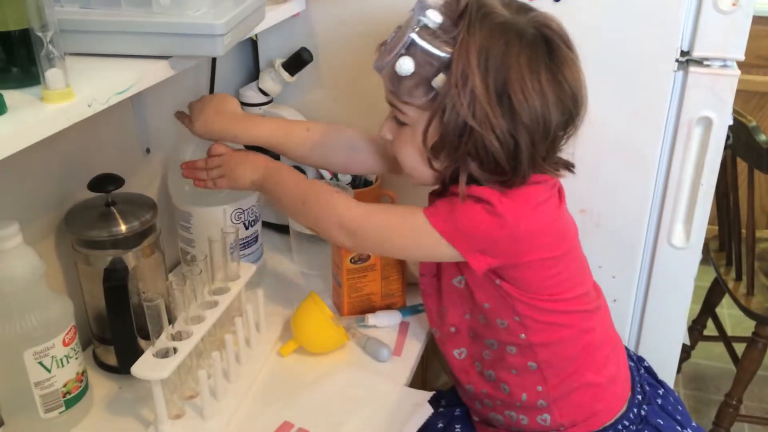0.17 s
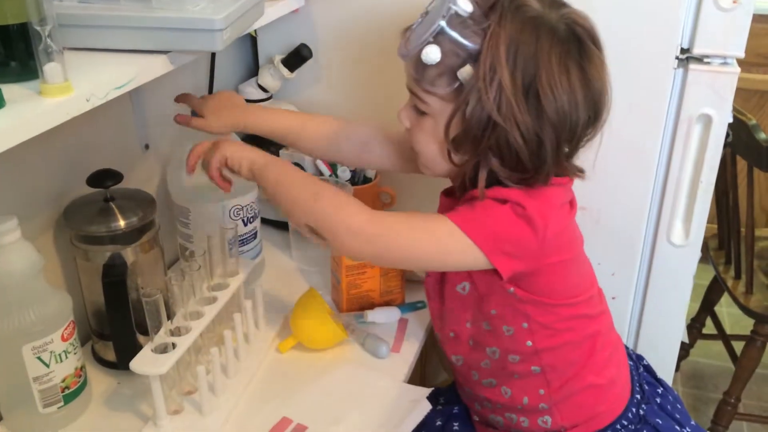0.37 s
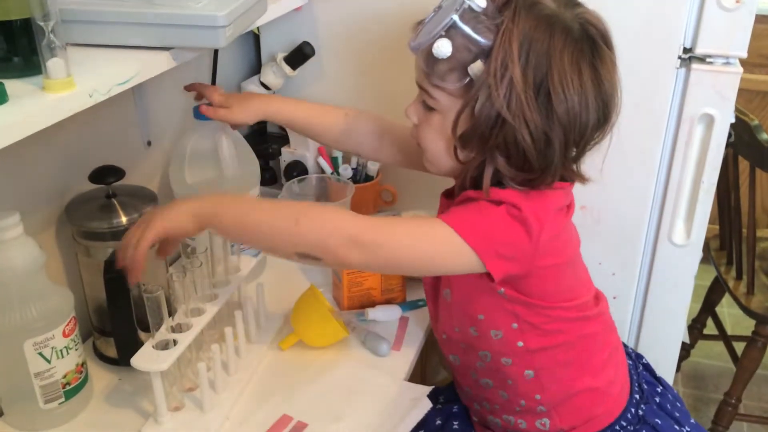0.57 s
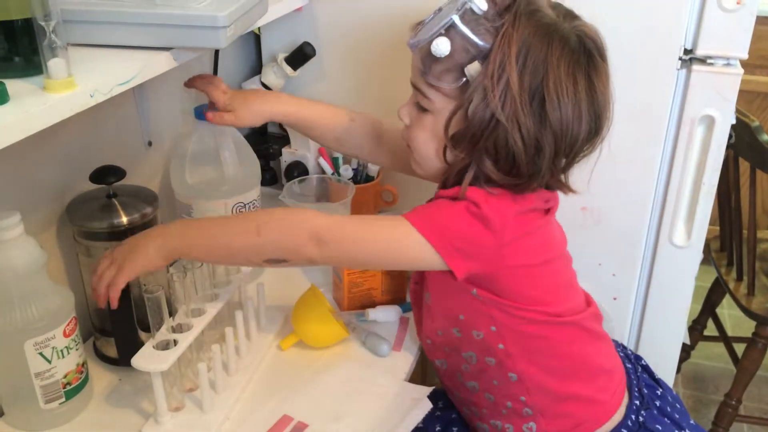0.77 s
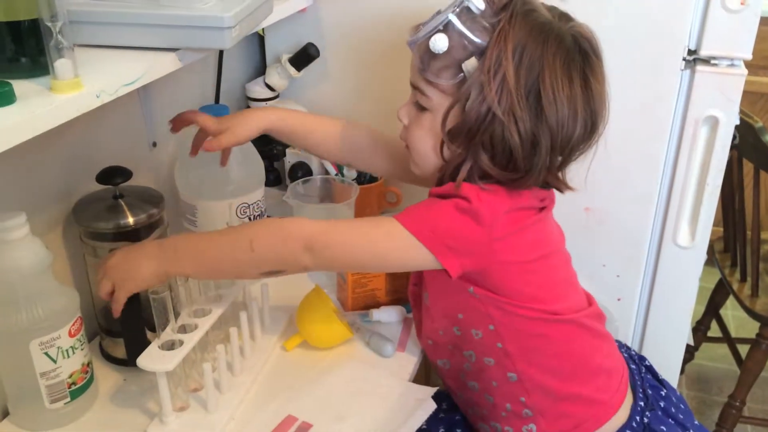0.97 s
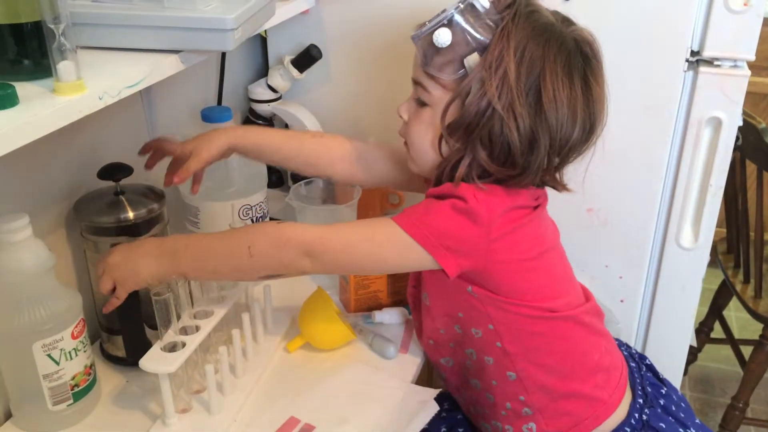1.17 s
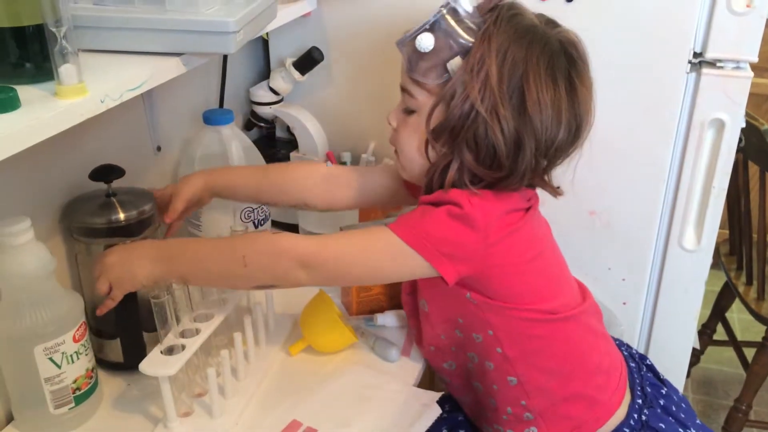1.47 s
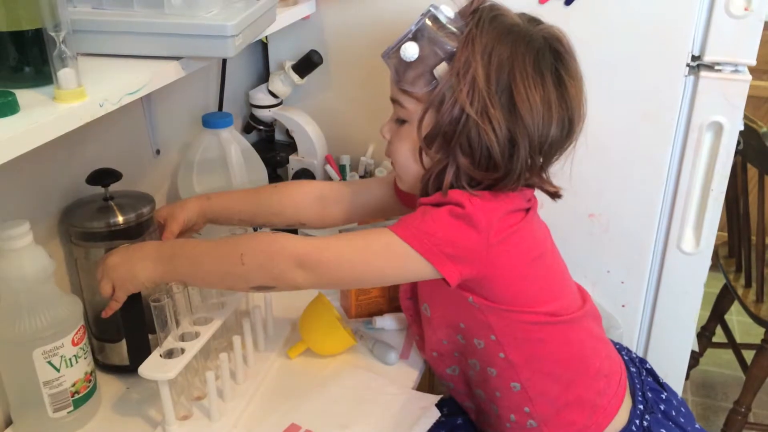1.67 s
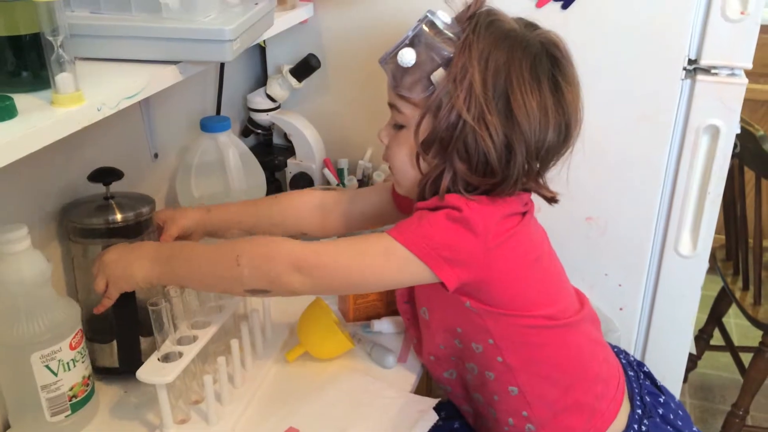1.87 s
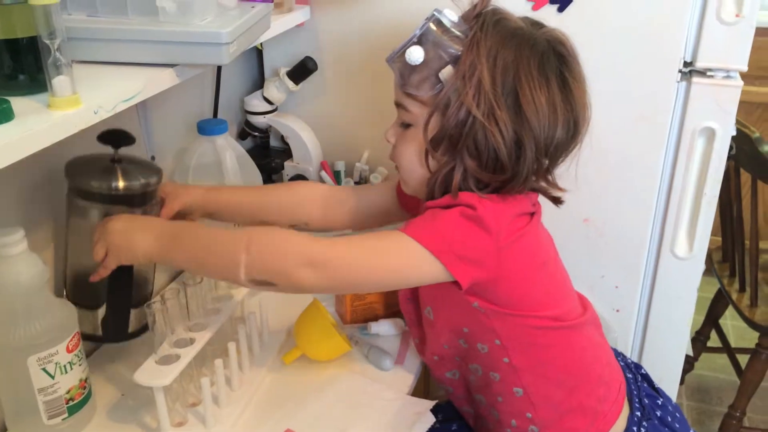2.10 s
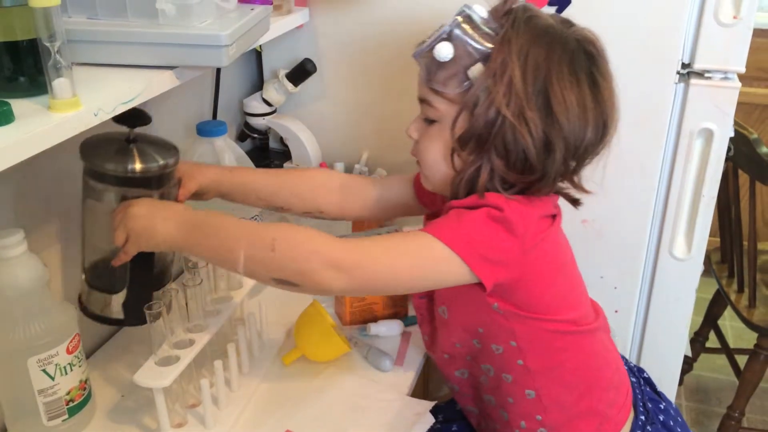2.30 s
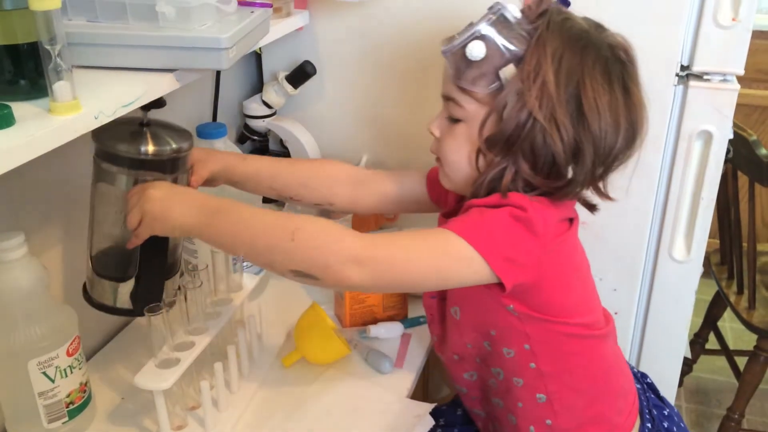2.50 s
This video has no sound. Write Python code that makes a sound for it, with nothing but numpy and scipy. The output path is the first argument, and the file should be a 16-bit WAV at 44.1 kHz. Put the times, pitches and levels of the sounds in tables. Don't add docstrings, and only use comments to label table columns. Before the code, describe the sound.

A glass coffee pot is handled with faint clicks, then knocks lightly and hard on a counter

```python
import sys
import numpy as np
from scipy import signal
from scipy.fft import rfft, irfft
from scipy.io import wavfile
from scipy.ndimage import uniform_filter1d

SR = 44100
rng = np.random.default_rng(int(sys.argv[2]) if len(sys.argv) > 2 else 0)


def rack_gain(trim_db):
    fader = np.asarray(trim_db, float)
    return 10 ** (fader / 20)


def store_pcm(level_fs):
    pcm = np.round(np.clip(level_fs, -1, 1) * 32767).astype(np.int16)
    wavfile.write(sys.argv[1], SR, np.atleast_2d(pcm).T)


N = 116865
T = np.arange(N) / SR

# (time [s], level [dB], contact [ms], shudder level [dB], shudder t60 [s])
BLOWS = [
    (1.5489, -26, 0.71, -33.5, 0.19),
    (2.0454, -15, 1.0, -19, 0.16),
]
# (frequency [Hz], level [dB], t60 [s])
COUNTER_LIGHT_MODES = [(218, -8, .07), (315, -11, 0.19), (395, 1, 0.053), (473, -4.5, 0.086),
                       (616, -4.5, 0.03), (793, -4.5, 0.047), (936, -9, 0.049), (1460, -7, 0.018)]
# (frequency [Hz], level [dB], t60 [s])
COUNTER_HARD_MODES = [(142, -1, 0.19), (194.2, -1, 0.23), (251.8, -1, 0.19), (309.7, -10, 0.3),
                      (354.8, -12, 0.33), (403.7, -17, 0.33), (521.4, -8.5, 0.15), (650, -9.5, 0.09),
                      (764, -29, 0.088), (875, -23, .07), (979, -12.5, 0.12), (1250, -28, 0.071),
                      (1314, -5, 0.081), (1670, -26, .05)]
# (frequency [Hz], density [dB/Hz])
SHUDDER_SPECTRA = [
    [(88, -37), (150, -30), (199, 2), (255, -3), (328, 12.5), (1120, -26), (8000, -53), (10400, -90), (17600, -120)],
    [(88, -53), (150, -6.5), (233, -8.5), (450, -20.5), (973, -27.5), (1430, -31.5), (2100, -35), (12000, -88), (15600, -103), (22000, -120)],
]
SWELL_START_S = (.202, .202, .202, .27, .401, .983, 1.228, 1.245, 1.288, 1.34, 1.4, 1.42, 1.55, 2.049, 2.42,
                 2.421, .205, .765, .974, .982, .983, .986, .99, 1.56, 2.039, 2.06, 2.075, 2.095, 2.115,
                 2.4205, 2.428, 2.438, 2.44, 2.458, 2.634, 1.31, .909, 2.2)
# (level [dB], frequency [Hz], rise [s], t60 [s])
SWELLS = [(-47, 1640, 0.0016, 0.042), (-37, 2250, 0.00084, 0.034), (-36.5, 5640, 0.00087, 0.02),
          (-48.5, 330, 0.015, 0.15), (-50, 1600, 0.0011, .03), (-36, 1410, 0.0019, 0.0087),
          (-41.5, 937, 0.0024, 0.031), (-45, 143, .02, 0.14), (-40.5, 170, .015, 0.065),
          (-37, 176, .02, .13), (-41, 156, 0.02, 0.095), (-42.5, 380, 0.016, 0.11),
          (-37.5, 1506, .001, 0.027), (-27, 290, 0.028, 0.17), (-37, 1188, 0.00077, 0.034),
          (-39, 2450, 0.00085, .02), (-32.5, 130, 0.0036, 0.029), (-33, 146, 0.0033, 0.036),
          (-31.5, 170, 0.0019, .04), (-44, 5700, 0.0016, 0.023), (-38, 512, 0.0043, 0.11),
          (-44, 730, 0.0021, 0.092), (-25, 157.6, 0.022, 0.17), (-12.5, 174.3, 0.042, 0.1),
          (-26, 91, 0.001, 0.061), (-16.5, 81, 0.037, 0.17), (-20, 113, 0.015, 0.19),
          (-28.5, 49.5, 0.028, 0.22), (-25, 230, 0.0054, 0.15), (-43, 5200, 0.00087, 0.016),
          (-44, 1700, 0.0011, .02), (-46, 1300, .006, 0.037), (-61, 1200, 0.024, 0.16),
          (-76, 970, 0.0058, 0.039), (-42.5, 580, 0.0028, 0.05), (-40, 1360, 0.0018, .02),
          (-44, 1650, 0.0017, 0.028), (-50, 290, 0.0305, 0.42)]
# (time [s], level [dB], centre [Hz], t60 [s])
CRACKS = [(0.144, -53.5, 4870, 0.051), (0.2025, -34.5, 8400, 0.029), (0.2042, -36.5, 2630, 0.03),
          (0.3994, -44.5, 2170, 0.023), (0.478, -55, 4570, 0.093), (0.645, -58.5, 4730, 0.041),
          (0.758, -60, 8000, 0.032), (.8175, -61, 5890, 0.029), (0.9088, -44, 4030, 0.012),
          (.968, -51.5, 5400, 0.051), (0.981, -37.5, 3270, 0.018), (1.058, -52.5, 5900, 0.021),
          (1.228, -49.5, 3500, 0.042), (1.55, -45, 2500, 0.013), (1.785, -59, 6670, 0.016),
          (1.621, -67.5, 5900, 0.25), (1.93, -54, 4400, 0.018), (2.047, -30, 3700, 0.018),
          (2.05, -56.5, 7000, 0.1), (2.063, -49, 2000, .03), (2.084, -57, 1510, 0.029),
          (2.121, -56, 1500, 0.029), (2.4192, -39.5, 3330, 0.016), (2.429, -72, 2780, 0.16),
          (2.629, -48, 2900, 0.022), (2.6349, -72, 4500, 0.011)]
# (time [s], counter level [dB], handle level [dB], handle pitch [ratio], tail level [dB])
POT_TAPS = [(0.202, -41, -43, 1.03, -63), (0.4, -48, -79, 1.26, -46.5), (0.909, -49.5, -51.5, 0.88, -41.5),
            (0.983, -36, -32.5, 1.05, -46), (0.994, -48, -50, 1.1, -64), (1.061, -54, -51, 1.06, -75),
            (1.0795, -52, -54, 1.02, -63), (1.2276, -49, -45, 0.755, -44.5), (1.311, -56, -52, 1.2, -62),
            (1.494, -69, -55, 1.6, -80), (1.55, -60, -59, 1.19, -48), (1.9328, -65, -50.5, 0.78, -53.5),
            (2.0031, -77, -51, 0.59, -52.5), (2.4204, -50.5, -34, 0.97, -42.5),
            (2.6323, -70, -44.5, 0.91, -38)]
# (frequency [Hz], level [dB], t60 [s])
TOUCH_MODES = [(135, -7.5, 0.078), (154.2, -1.5, 0.19), (195.6, -5.5, 0.13), (280.7, -12.5, 0.18),
               (359.5, -5, 0.088), (570, -4.5, 0.062)]
# (frequency [Hz], level [dB], t60 [s])
HANDLE_MODES = [(760, -8, .012), (980, -2, .016), (1180, -1, .014), (1360, 0, .018), (1640, -2, .014),
                (2300, -10, .01), (3200, -14, .008)]
# (frequency [Hz], level [dB], t60 [s])
LID_MODES = [(8900, -8, .07), (9270, -4, .09), (10260, 0, .09), (12630, -4, .06)]
# (time [s], length [s], pitch by resting position [ratio])
JINGLE_TIMES = [(.95, .02, 1), (.983, .01, 1.01), (1.072, .065, 1), (1.228, .01, 1.03), (1.9, .045, 1),
                (1.962, .01, 1.035), (2.4212, .045, 1), (2.635, .01, 1.02)]
# (strike level [dB], chatter level [dB], tilt [dB/mode])
JINGLE_LEVELS = [(-63, -83, -2), (-44, -75, -7.5), (-74, -76, 3), (-47, -72, -9), (-81, -82, 1.5),
                 (-60, -80, -3), (-52, -73, 2.2), (-64, -79, 2)]
# (time [s], level [dB], extra treble [dB])
RUB_MOTION = [(0.0, -61.5, -7.5), (0.38, -63, 2.5), (0.65, -69.5, -2.5), (0.9, -71, -2.5), (1.11, -66, -4),
              (1.2, -67, -3), (1.31, -60.5, -9.5), (1.42, -63, -11), (1.62, -83, 7), (2.1, -73.5, -2),
              (2.23, -83.5, 5), (2.65, -89, 11)]
# (frequency [Hz], density [dB/Hz])
RUB_SPECTRUM = [(300, -14.5), (500, -0.5), (1200, -6), (2400, -8), (4000, -12), (7000, -11.5), (10000, -19),
                (15000, -51)]
# (frequency [Hz], t60 [s])
SQUEAK_MODE = (3050, .014)
# (time [s], level [dB])
SQUEAK_LEVEL = [(.1, -76), (.24, -65), (.36, -65), (.47, -65), (.65, -75), (.8, -90), (1.08, -82),
                (1.14, -68), (1.2, -78), (1.3, -70), (1.45, -76), (1.6, -95)]
# (time [s], level [dB])
SLIDE_LEVEL = [(1.22, -88), (1.26, -50.5), (1.3, -49.5), (1.37, -51), (1.43, -48), (1.47, -60), (1.52, -71)]
# (frequency [Hz], level [dB], t60 [s])
SCRAPE_MODES = [(149.3, 1.5, 0.14), (169, -0.5, 0.085), (292, -5, .08), (354, -5.5, 0.099),
                (540, -24, 0.033)]
# (frequency [Hz], density [dB/Hz])
HUM_SPECTRUM = [(18, -24), (30, 1.5), (113, -0.5), (180, -7), (460, -18), (1140, -29.5), (1780, -29),
                (15000, -41)]
# (frequency [Hz], level [dB], t60 [s])
DRONE_MODE = (119, -58.5, 0.34)
# (time [s], gain [dB])
LEAN_GAIN = [(0, -1), (.17, 3.5), (.45, 2), (.7, 0), (.95, 0), (1.2, -3), (1.45, -4.5), (1.6, 2),
             (1.85, -11), (2.2, -2), (2.4, -4.5), (2.65, -5.5)]


def level(x, db):
    return x * rack_gain(db) / np.sqrt(np.mean(x ** 2))


def decay(u_s, t60_s):
    return np.exp(-np.log(1000) * u_s / t60_s)


def fade(t0_s, rise_s, t60_s):
    u_s = np.maximum(T - t0_s, 0)
    return (1 - np.exp(-u_s / rise_s)) * decay(u_s, t60_s)


def curve(points):
    return rack_gain(np.interp(T, *np.array(points).T))


def ring(force, modes, ratio=1, tilt_db=0):
    out = np.zeros(len(force))
    for k, (hz, db, t60_s) in enumerate(modes):
        t60_s = min(max(t60_s, .005), .5)
        pole = np.exp(2j * np.pi * hz * ratio / SR - np.log(1000) / (t60_s * SR))
        mode = signal.lfilter([1], [1, -pole], force).imag
        out = out + (-1) ** k * rack_gain(db + tilt_db * k) * mode
    return out


def colour(points):
    hz, db = np.array(points).T
    f_hz = np.maximum(np.arange(N // 2 + 1) * SR / N, 1)
    gain = rack_gain(np.interp(np.log(f_hz), np.log(hz), db))
    return level(irfft(rfft(rng.standard_normal(N)) * gain, N), 0)


def walk(rate_hz):
    k = int(SR / rate_hz)
    steps = np.repeat(rng.standard_normal(N // k + 1), k)
    w = uniform_filter1d(uniform_filter1d(steps, k), k)[:N]
    return w / w.std()


def burst(noise, t0_s, rise_s, t60_s, hz):
    edges_hz = [hz / 3, min(hz * 2, 20000)]
    band = signal.butter(2, edges_hz, "band", fs=SR, output="sos")
    return signal.sosfilt(band, noise * fade(t0_s, rise_s, t60_s))


def push(t0_s, ms):
    u = np.clip((T - t0_s) * 1000 / ms, 0, 1)
    return np.sin(np.pi * u) * np.pi / 2 / (ms * SR / 1000)


def grains(per_s, spread_db):
    chance, sign, size = rng.random((3, N))
    hits = (chance < per_s / SR) * np.sign(sign - .5)
    return level(hits * rack_gain(-spread_db * np.log(size)), 0)


def knocks():
    out = np.zeros(N)
    counters = (COUNTER_LIGHT_MODES, COUNTER_HARD_MODES)
    for (t, db, ms, shudder_db, t60_s), modes, spectrum in zip(BLOWS, counters, SHUDDER_SPECTRA):
        force = push(t, ms) - 0.28 * push(t - .003, 1.6)
        out += rack_gain(db) * ring(force, modes)
        out += rack_gain(shudder_db) * colour(spectrum) * fade(t, 0.00039, t60_s)
    return out


def swells():
    out = np.zeros(N)
    for t, (db, hz, rise_s, t60_s) in zip(SWELL_START_S, SWELLS):
        out += rack_gain(db) * fade(t, rise_s, t60_s) * np.sin(2 * np.pi * hz * (T - t))
    return out


def cracks():
    noise = rng.standard_normal(N)
    return 2 * sum(rack_gain(db) * burst(noise, t, 0.0017, t60_s, hz) for t, db, hz, t60_s in CRACKS)


def taps():
    handle_noise, tail_noise = rng.standard_normal((2, N))
    touch, pot = np.zeros(N), np.zeros(N)
    for t, counter_db, handle_db, ratio, tail_db in POT_TAPS:
        touch += rack_gain(counter_db) * push(t, 0.68)
        force = handle_noise * fade(t, 0.0003, 0.027) / 14 + push(t, 0.051)
        pot += rack_gain(handle_db) * ring(force, HANDLE_MODES, ratio)
        pot += rack_gain(tail_db) * burst(tail_noise, t, 0.0013, .22, 1290 * ratio)
    return ring(touch, TOUCH_MODES) + pot


def lid():
    chatter = grains(500, 1.1) / 10
    out = np.zeros(N)
    for (t, length_s, ratio), (strike_db, chatter_db, tilt_db) in zip(JINGLE_TIMES, JINGLE_LEVELS):
        strike = rack_gain(strike_db) * (np.arange(N) == int(t * SR))
        rattle = rack_gain(chatter_db) * chatter * (T > t) * (T < t + length_s)
        out += ring(rattle + strike, LID_MODES, ratio, tilt_db)
    return out


def slide():
    return level(ring(grains(350, 2.5), SCRAPE_MODES), 0) * curve(SLIDE_LEVEL)


def rub():
    s, db, treble_db = np.array(RUB_MOTION).T
    highpass = signal.butter(2, 8000, "high", fs=SR)
    treble = level(signal.lfilter(*highpass, rng.standard_normal(N)), 0)
    hiss = colour(RUB_SPECTRUM) + treble * rack_gain(np.interp(T, s, treble_db))
    return hiss * rack_gain(np.interp(T, s, db) + walk(25.72))


def squeak():
    hz, t60_s = SQUEAK_MODE
    narrow = level(ring(rng.standard_normal(N), [(hz, 0, t60_s)]), 0)
    return narrow * rack_gain(2 * walk(28.8)) * curve(SQUEAK_LEVEL)


def echo(near):
    u_s = T[:SR // 2]
    tail = rng.standard_normal(len(u_s)) * decay(u_s, 0.28) * (u_s > .004)
    tail = signal.lfilter(*signal.butter(2, 700, "high", fs=SR), tail)
    tail = signal.lfilter(*signal.butter(1, 2700, fs=SR), tail)
    tail = level(tail, -14) / np.sqrt(len(u_s))
    return signal.fftconvolve(near, tail)[:N]


def hum():
    hz, db, t60_s = DRONE_MODE
    drone = level(ring(rng.standard_normal(N), [(hz, 0, t60_s)]), db)
    return rack_gain(-58) * colour(HUM_SPECTRUM) + drone * rack_gain(0.51 * walk(6.0)) * curve(LEAN_GAIN)


def scene():
    near = knocks() + swells() + cracks() + taps() + lid() + slide() + rub() + squeak()
    return (near + echo(near) + hum())[None]


def low_pass(x):
    return signal.sosfilt(signal.butter(12, 16060, fs=SR, output="sos"), x)


def record(dry):
    x = signal.sosfilt(signal.butter(4, 39.5, "high", fs=SR, output="sos"), dry)
    x = signal.sosfilt(signal.ellip(10, .2, 70, 15450, fs=SR, output="sos"), x)
    return low_pass(x)


dry = scene()
out = record(dry)
store_pcm(out)
```